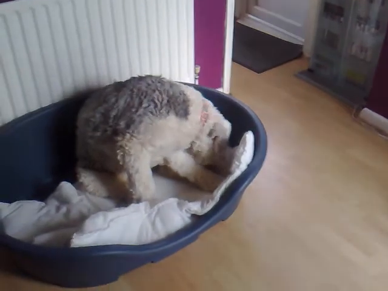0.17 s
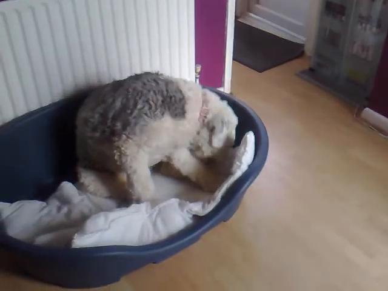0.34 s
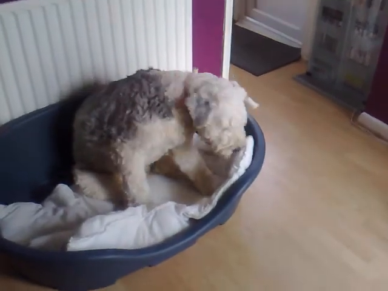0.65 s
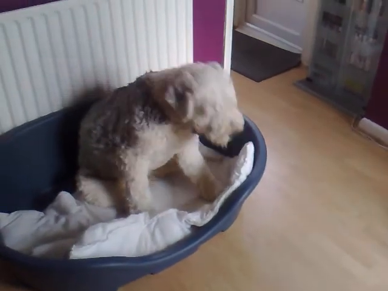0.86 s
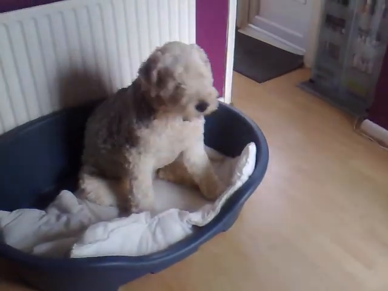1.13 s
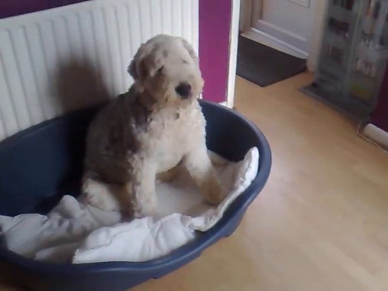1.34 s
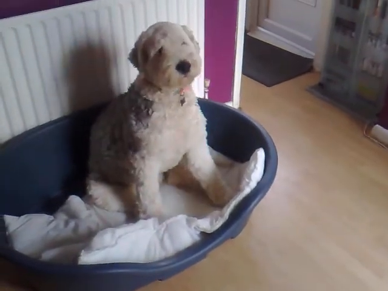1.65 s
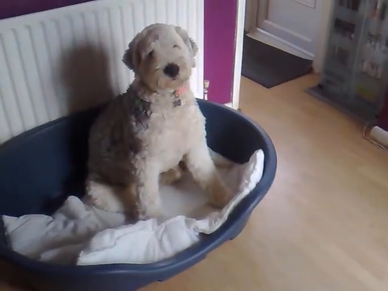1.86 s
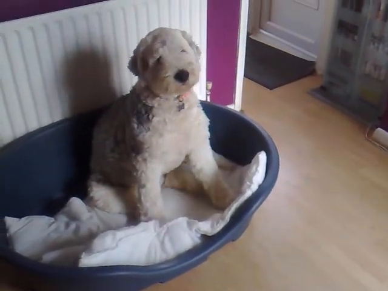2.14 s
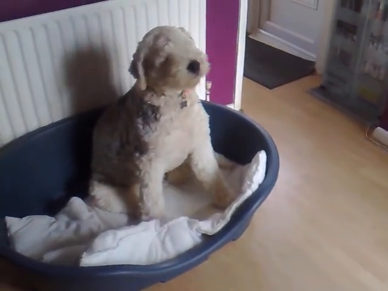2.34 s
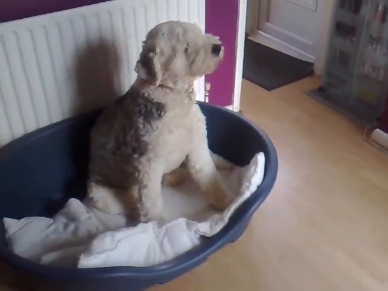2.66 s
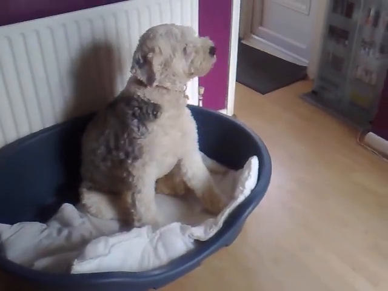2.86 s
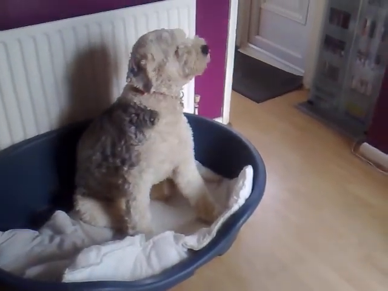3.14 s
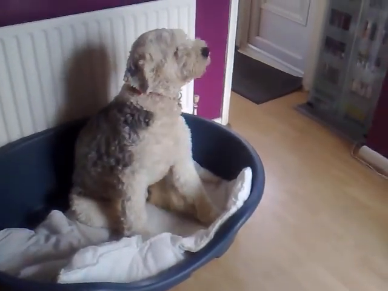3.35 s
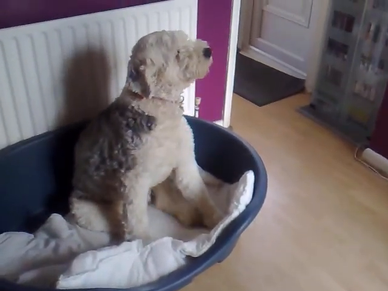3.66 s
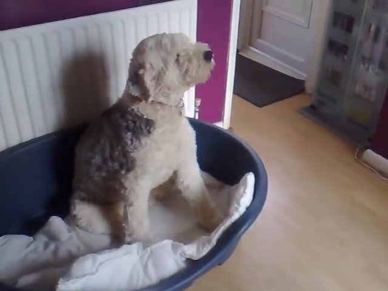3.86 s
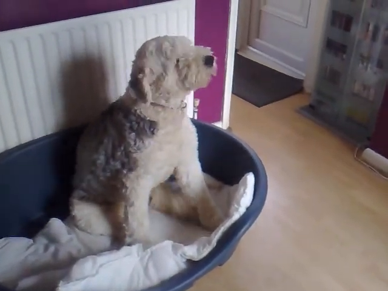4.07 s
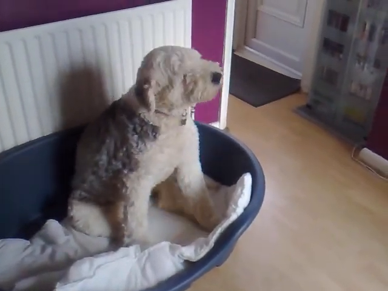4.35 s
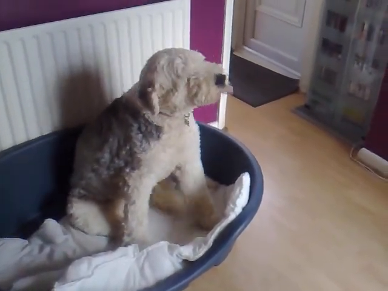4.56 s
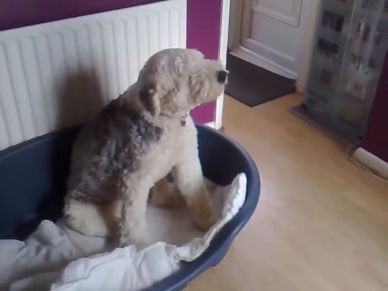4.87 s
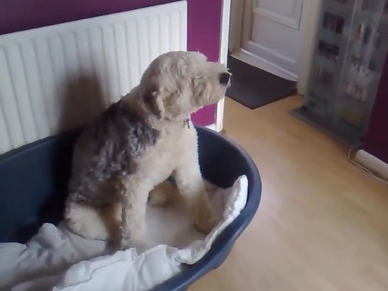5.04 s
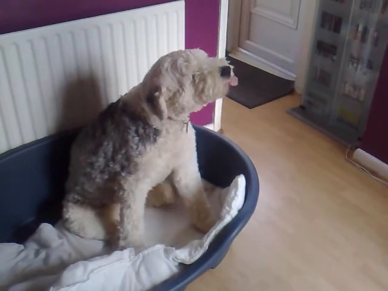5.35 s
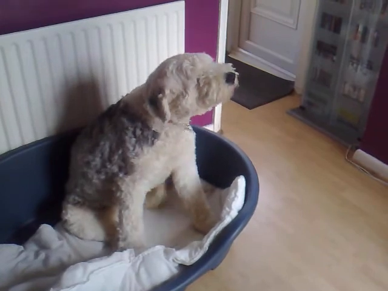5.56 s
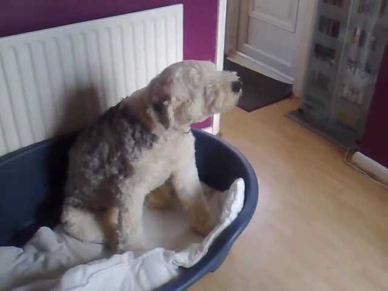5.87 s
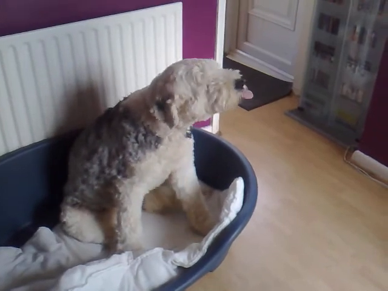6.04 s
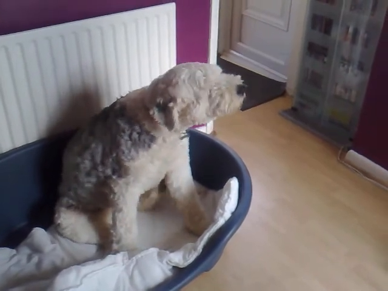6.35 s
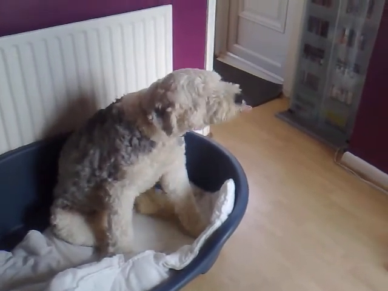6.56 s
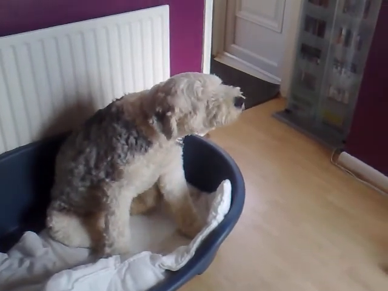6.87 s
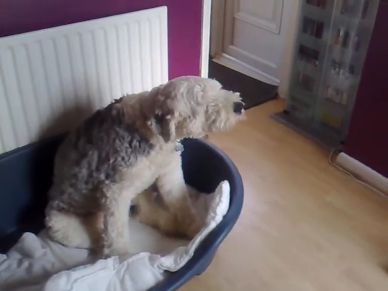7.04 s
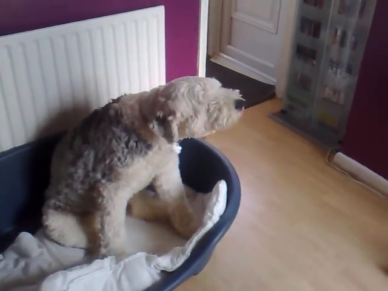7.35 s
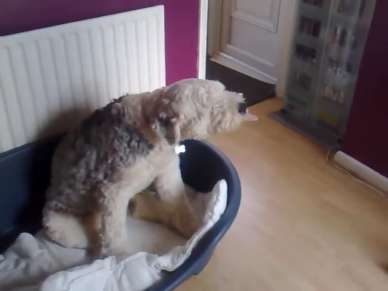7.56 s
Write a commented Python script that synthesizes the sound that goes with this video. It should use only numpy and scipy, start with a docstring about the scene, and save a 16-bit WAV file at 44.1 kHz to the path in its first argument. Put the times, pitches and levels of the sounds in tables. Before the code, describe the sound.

In a quiet living room with a hard floor, a dog stirs in a moulded plastic bed. Faint licks and blanket rustles mix with dull bumps and low floorboard thuds. Near five seconds its hind leg strikes the bed wall with a loud hollow crack; after a pause, knocks repeat about four times a second until the end. Low house rumble and light microphone hiss lie beneath.

```python
"""A dog scratches in a moulded plastic bed on a hard floor: its hind leg knocks the bed wall, in the end about
four times a second. Each knock is quick falling waves, fading shell tones and room echoes made of noise.
Its body bumps the bed and its weight swings the floor boards. Licks and blanket rubs are short filtered noise,
and a collar tag tinkles in fading sine tones. Behind it all lie house rumble and microphone hiss;
the microphone drops the deepest bass and its input stage rounds the loudest peaks."""
import sys
import numpy as np
from scipy import signal
from scipy.fft import rfft, irfft, next_fast_len
from scipy.io import wavfile
from scipy.ndimage import uniform_filter1d

SR = 44100
rng = np.random.default_rng(int(sys.argv[2]) if len(sys.argv) > 2 else 0)


def log_audio(samples):
    """Write samples as a 16-bit WAV file to the path given in sys.argv[1]."""
    # one column per channel
    frames = np.atleast_2d(samples).T
    # limit to full scale, then quantise
    limited = np.clip(frames, -1, 1)
    pcm = np.round(limited * 32767).astype(np.int16)
    wavfile.write(sys.argv[1], SR, pcm)


def decibels_to_gain(level_db):
    """Convert a level in decibels to a linear amplitude gain (20 dB per decade)."""
    exponent = np.asarray(level_db, float) / 20
    return 10 ** exponent


N = 339945  # length of the scene [samples]
LEN = 2 ** 14  # length of one blow, ring or room tail [samples]
BANDS = 25.4 * 2 ** np.arange(0, 9.5, 1 / 3)  # centres of third-octave bands [Hz]


def on_log(table, hz):
    """Read a (frequency [Hz], value) table on a log-frequency axis, as we hear pitch."""
    table_hz, value = np.transpose(table)
    return np.interp(np.log(hz), np.log(table_hz), value)


def unit(x):
    """Scale each row to rms 1."""
    return x / np.sqrt(np.mean(x ** 2, axis=-1, keepdims=True))


def split(x):
    """Split a sound into overlapping third-octave bands that add up to it again."""
    hz = np.fft.rfftfreq(len(x), 1 / SR)
    steps_away = 3 * np.log2(hz[None] / BANDS[:, None] + 1e-9)
    weight = np.cos(np.pi / 2 * np.clip(steps_away, -1, 1)) ** 2
    return irfft(rfft(x) * weight, len(x))


def band(x, hz, width):
    """Resonance with gain 1 at the centre; hz and width in Hz."""
    return signal.lfilter(*signal.iirpeak(hz, hz / width, SR), x)


def walk(rate):
    """Slowly wandering level: random values, rate of them a second, smoothed twice."""
    hold = int(SR / rate)
    steps = np.repeat(rng.standard_normal(N // hold + 1), hold)
    return uniform_filter1d(uniform_filter1d(steps, hold), hold)[:N]


def add(out, s, sound):
    """Mix a sound in at time s [s]."""
    start = int(s * SR)
    out[start:start + len(sound)] += sound[:len(out) - start]


def ring(modes, phase):
    """A struck object sings in several tones at once; one row per tone, a sine that fades."""
    hz, db, t60 = (column[:, None] for column in np.transpose(modes))
    t = np.arange(LEN) / SR
    onset = 1 - np.exp(-t * hz / 2)
    return decibels_to_gain(db - 60 * t / t60) * np.sin(2 * np.pi * (hz * t + phase[:, None])) * onset


def room():
    """Echoes band by band, separate at first and then dense: each band swells, then fades at its own rate."""
    # time to fade by 60 dB: (frequency [Hz], time [s])
    fade_table = [(40, 0.91), (110, 0.31), (280, 0.26), (740, 0.28), (1940, 0.3), (4100, 0.25),
                  (5200, 0.26), (6500, 0.2), (13500, 0.23)]
    # how slowly the echoes build up, the lows slowest: (frequency [Hz], time [ms])
    rise_table = [(40, 29), (120, 6.9), (400, 1.67), (1200, 8.7), (4000, 2.23), (12000, 0.7)]
    t = np.arange(LEN) / SR
    rise = on_log(rise_table, BANDS)[:, None] / 1000
    t60 = on_log(fade_table, BANDS)[:, None]
    # uneven loudness makes the first echoes stand apart
    patchy = decibels_to_gain(7.6 * np.exp(-t / 0.038) * np.repeat(rng.standard_normal(LEN // 32), 32))
    echoes = rng.standard_normal(LEN) * patchy / np.sqrt(uniform_filter1d(patchy ** 2, size=512))
    return unit(split(echoes)) * (1 - np.exp(-(t / rise) ** 3)) * decibels_to_gain(-60 * t / t60)


def first_waves():
    """The bending waves of the wall glide down in pitch, with early echoes; every bounce may turn them over."""
    # waves straight to the microphone, each gliding down in pitch; the brighter one follows 2.3 ms later:
    # (delay [ms], start frequency [Hz], end frequency [Hz], level [dB], length [ms])
    wave_table = [(0.1, 2530, 840, -0.5, 2.254), (2.4, 6100, 4070, -2.5, 2.62)]
    # floor, radiator and walls return the waves: (delay [ms], level [dB])
    echo_table = [(0, -1.5), (4.3, 4.5), (6.0, -4.5), (8.9, -4), (11.8, -13.5), (19, -19), (22.5, -5.5),
                  (43.8, -15)]
    t, rows = np.arange(LEN) / SR, []
    taps = np.zeros(4096)
    delay_ms, echo_db = np.transpose(echo_table)
    turned = np.r_[1, rng.choice([-1, 1], len(delay_ms) - 1)]
    taps[(delay_ms * SR / 1000).astype(int)] = decibels_to_gain(echo_db) * turned
    for lag, start_hz, end_hz, db, length in wave_table:
        progress = np.clip((1000 * t - lag) / length, 0, 1)
        turns = (start_hz + (end_hz - start_hz) * progress / 2) * progress * length / 1000
        wave = decibels_to_gain(db) * np.sin(np.pi * progress) ** 2 * np.sin(2 * np.pi * turns)
        rows.append(signal.fftconvolve(wave, taps)[:LEN])
    return sum(rows)


def blows():
    """List kicks, toe touches and bumps: (time [s], shell [dB], then thud, drum, boom, claw [dB re shell])."""
    # hind leg against the bed wall: (time [s], shell [dB], boom [dB re shell], claw [dB re shell])
    kick_table = [(4.893, -5, -8.5, -21), (5.7042, -7.5, -7.5, -21), (5.9674, -4, -11, -20),
                  (6.2517, -6, -13, -27.5), (6.4983, 0.5, -12.5, -14), (6.773, -5, -13, -22),
                  (7.0312, -5, -16, -22.5), (7.288, 0.5, -13.5, -15.5), (7.5617, -1.5, -14, -15.5)]
    # toes touch the wall just before a kick: (time [s], shell [dB])
    toe_table = [(4.8783, -23.5), (5.6857, -25.5), (5.956, -27), (6.2181, -29.5), (6.4851, -28),
                 (6.7343, -30.5), (6.9956, -27), (7.2717, -25.5)]
    # body and paws bump the bed:
    # (time [s], shell [dB], drum [dB re shell], boom [dB re shell], claw [dB re shell])
    bump_table = [(1.2928, -20, -10, -11, -23.5), (1.837, -41, 1, 7, -34), (2.6847, -54, 7, 5.5, -19),
                  (3.0485, -58, 2, 3, -20), (3.5238, -20.5, -19, -10.5, -34), (3.948, -29.5, -13, -6, -43),
                  (4.2123, -46, -3, -9, -20.5), (4.296, -46.5, 22, 11, -30), (4.315, -38, -5, 3.5, -59),
                  (4.555, -41.5, -10, -4, -33), (5.1516, -47, -15, 1, -27.5),
                  (5.1655, -41.5, -2, -27, -23.5), (5.406, -29, -5.5, -2.5, -31.5)]
    bump_thud_db, toe_thud_db, toe_boom_db = -16.5, -18, -5.5  # relative to shell
    rows = []
    for s, db, drum_db, boom_db, claw_db in bump_table:
        rows.append((s, db, bump_thud_db, drum_db, boom_db, claw_db))
    for s, db, boom_db, claw_db in kick_table:
        thud_db = -19 + 0.86 * db  # a harder kick shakes the floor more
        drum_db = thud_db + 6.5  # the bed floor drums
        rows.append((s, db, thud_db, drum_db, boom_db, claw_db))
    for (s, db), kick in zip(toe_table, kick_table):
        lead_ms = 1000 * (kick[0] - s)
        claw_db = -23.5 - 0.4 * lead_ms  # a touch long before its kick is slow, so duller
        rows.append((s, db, toe_thud_db, toe_thud_db, toe_boom_db, claw_db))
    return rows


def knocks():
    """Every blow wakes the same shell and room, coloured by what hit and mixed over a few spots."""
    # tones of floor boards and bed wall: (frequency [Hz], relative level [dB], time to fade by 60 dB [s])
    shell_modes = [(36.9, 10.5, 0.24), (46.1, 27.5, 0.13), (69.5, 5, 0.41), (87.7, 8.5, 0.27),
                   (93.1, 7.5, 0.15), (136, -3, 0.46), (193.3, 3, 0.3), (246, 7.5, 0.17),
                   (368, -3.5, 0.052), (447, 3, 0.03), (592, -4.5, 0.26), (644.1, 5, 0.13),
                   (718, -10.5, 0.29), (775.4, -2.5, 0.094), (1063, -6, 0.14), (1155, 5.5, 0.065),
                   (1480, -12, .15), (1702, -8.5, 0.3), (1870, -11.5, 0.23), (2800, -6.5, 0.099)]
    # centres of thud, drum, boom, shell, rap and claw: (frequency [Hz])
    layer_hz = [48, 97, 200, 1000, 2300, 4400]
    # tone colour of the room: (frequency [Hz], relative level per band [dB])
    room_colour = [(28, -4), (60, -11.5), (130, 0), (300, 1), (1100, -6), (2000, -1.5), (2600, -2),
                   (3200, 0.5), (4100, 8.5), (5200, -4), (6500, -6), (9000, -16.5), (13000, -16),
                   (17000, -24.5)]
    shell_gain_db, room_gain_db = -13, -14.5
    spot_share = 0.7  # how much each knock differs, as it lands on another spot
    mode_scatter_db = 2.5  # each blow wakes the modes unevenly
    soft_db, soft_ms = -47.5, 4.4  # blows this weak or weaker are softest, with pushes fading over this time

    out, t = np.zeros(N), np.arange(2048) / SR
    echoes = np.array([room() for _ in range(4)])
    mode_count = len(shell_modes)
    shell, waves = ring(shell_modes, np.zeros(mode_count)), split(first_waves())
    mode_hz = np.transpose(shell_modes)[0]
    for s, db, thud_db, drum_db, boom_db, claw_db in blows():
        rap_db = 2.5 + 0.46 * claw_db  # the rap band dims about half as fast as the claw band
        layers = list(zip(layer_hz, (thud_db, drum_db, boom_db, 0, rap_db, claw_db)))
        colour = on_log(layers, BANDS)
        spot = np.r_[1, spot_share * rng.standard_normal(3)]
        tail = np.tensordot(spot / np.linalg.norm(spot), echoes, 1)
        sound = decibels_to_gain(colour + on_log(room_colour, BANDS) + room_gain_db) @ tail
        scatter_db = mode_scatter_db * rng.standard_normal(mode_count)
        sound += decibels_to_gain(shell_gain_db + on_log(layers, mode_hz) + scatter_db) @ shell
        sound += decibels_to_gain(colour) @ waves
        # hard blows are nearly one crack; weak ones add ragged pushes through fur and blanket
        soft = np.clip(db / soft_db, .02, 1) ** 3
        push = np.abs(rng.standard_normal(len(t))) ** 4 * np.exp(-1000 * t / (soft_ms * soft))
        push *= soft / np.linalg.norm(push)
        push[0] += 1 - soft / 2
        # band by band the pushes add in and out of step; the blow keeps its energy
        blow = split(signal.fftconvolve(sound, push)[:LEN])
        keep = np.linalg.norm(split(sound), axis=1) / np.linalg.norm(blow, axis=1)
        last_quarter_fade = np.clip(4 - 4 * np.arange(LEN) / LEN, 0, 1)
        add(out, s, decibels_to_gain(db) * keep @ blow * last_quarter_fade)
    return out


def thuds():
    """Weight makes the boards give a few slow swings, a little different in pitch each time."""
    # weight lands on the floor boards: (time [s], level [dB])
    landings = [(1.295, -40), (1.84, -38.5), (2.305, -47), (2.68, -51), (3.04, -54), (3.529, -37.5),
                (3.94, -44), (4.25, -43), (4.595, -45), (5.405, -35), (5.66, -39)]
    rise_ms, t60_s = 22, 0.36
    out, t = np.zeros(N), np.arange(LEN) / SR
    swell = (1 - np.exp(-(1000 * t / rise_ms) ** 2)) * decibels_to_gain(-60 * t / t60_s)
    for s, db in landings:
        detune = 1 + 0.049 * rng.standard_normal()
        # two boards beat; they swing together near the top of the swell
        swing = sum(np.cos(2 * np.pi * hz * detune * (t - rise_ms / 1000)) for hz in (37.5, 47.2)) / 2
        add(out, s, decibels_to_gain(db) * swell / swell.max() * swing)
    return out


def rubs(table, share, ms):
    """Short grainy noise around one pitch, with the room behind; share is filter width over centre."""
    out, t = np.zeros(N), np.arange(8192) / SR
    echo = np.r_[1, decibels_to_gain(-42) * room().sum(0)[1:]]
    envelope = np.exp(-1000 * t / ms) * (1 - np.exp(-t / 0.00083))
    for s, db, hz in table:
        noise, roughness = rng.standard_normal((2, 8192))
        grains = unit(noise * decibels_to_gain(8.0 * roughness))
        rub = unit(band(band(grains, hz, share * hz), hz, share * hz)) * envelope
        add(out, s, decibels_to_gain(db) * signal.fftconvolve(rub, echo))
    return out


def licks():
    """The tongue makes broad wet smacks: wide bursts of grainy noise."""
    # (time [s], level [dB], centre frequency [Hz])
    lick_table = [(.582, -47.5, 2970), (3.861, -55.5, 1970), (4.374, -64, 1200), (4.691, -55, 1560)]
    return rubs(lick_table, share=1.3, ms=8.6)


def rustles():
    """Fur and blanket rub together: narrower bursts of grainy noise."""
    # (time [s], level [dB], centre frequency [Hz])
    rustle_table = [(.205, -66, 1790), (.47, -61, 535), (1.21, -65, 1450), (1.648, -56.5, 1950),
                    (1.74, -62, 2300), (1.953, -63, 2080), (2.079, -69, 730), (2.53, -57, 1900),
                    (2.776, -63.5, 604), (3.669, -58.5, 1940), (3.72, -63, 455)]
    return rubs(rustle_table, share=0.4, ms=9.8)


def tag():
    """A small metal disc ticks against its ring and sings, blurred by the room."""
    # collar tag strikes: (time [s], level [dB])
    strikes = [(6.188, -57.5), (6.255, -61), (6.318, -67)]
    # tones of the disc: (frequency [Hz], relative level [dB], time to fade by 60 dB [s])
    disc_modes = [(6800, -1, .2), (7880, 1, .2), (9170, -10, .09), (10400, -8, .08), (10800, -6, .1),
                  (14500, -6, .1), (14700, -6, .12)]
    out = np.zeros(N)
    echo = np.r_[1, decibels_to_gain(-44) * room().sum(0)[1:]]
    for s, db in strikes:
        dimming, phase = rng.random((2, len(disc_modes)))
        sound = decibels_to_gain(-2 * dimming) @ ring(disc_modes, phase)
        sound[:3] += 2.0 * np.array([1, -2, 1])  # the tick
        add(out, s, decibels_to_gain(db) * signal.fftconvolve(sound, echo))
    return out


def hush():
    """House rumble that wavers in the bass, smooth microphone hiss above, a few faint bands."""
    # colour of the background noise: (frequency [Hz], relative level per Hz [dB])
    noise_colour = [(25, -11), (40, 7), (60, -4.5), (100, 0), (137, 0), (200, -2.5), (250, -3), (330, -6.5),
                    (500, -10), (800, -13.5), (1300, -13), (2500, -20), (5000, -23), (9000, -24.5),
                    (13000, -23.5), (16000, -23.5)]
    # faint narrow bands: (centre frequency [Hz], width [Hz], level [dB])
    faint_bands = [(145.3, 12, -72), (1327, 60, -77.5), (1944, 200, -77.5), (4740, 330, -81.5),
                   (9550, 270, -90)]
    noise = rng.standard_normal(next_fast_len(N))
    bands, swell = unit(split(noise)[:, :N]), walk(1.56)
    waver = np.clip(2.5 - 1.15 * np.log10(BANDS / 30), .1, 5)  # strongest in the bass
    out = np.zeros(N)
    for hz, depth, row in zip(BANDS, waver, bands):
        band_db = on_log(noise_colour, hz) + 10 * np.log10(hz)  # a wider band holds more noise
        out += decibels_to_gain(band_db + depth * (1.2 * swell + 1.8 * walk(13))) * row
    peaks = np.zeros(N)
    for hz, width, db in faint_bands:
        peaks += decibels_to_gain(db + 2.8 * walk(3.1)) * unit(band(rng.standard_normal(N), hz, width))
    return decibels_to_gain(-61) * unit(out) + peaks


def scene():
    """Everything the dog does and the quiet house, added up at one microphone."""
    return (knocks() + thuds() + licks() + rustles() + tag() + hush())[None]


def roll_off(x):
    """The treble ends steeply here."""
    return signal.sosfilt(signal.butter(12, 16800, fs=SR, output="sos"), x)


def record(dry):
    """The microphone drops the deepest bass; its input stage flattens the loudest peaks, fairly sharply."""
    low_cut_hz, ceiling, knee = 30, 0.74, 3.0  # ceiling: the level that peaks cannot pass
    heard = signal.sosfilt(signal.butter(2, low_cut_hz, "high", fs=SR, output="sos"), dry)
    rounded = heard / (1 + np.abs(heard / ceiling) ** knee) ** (1 / knee)
    return roll_off(rounded)


dry = scene()
out = record(dry)
log_audio(out)
```